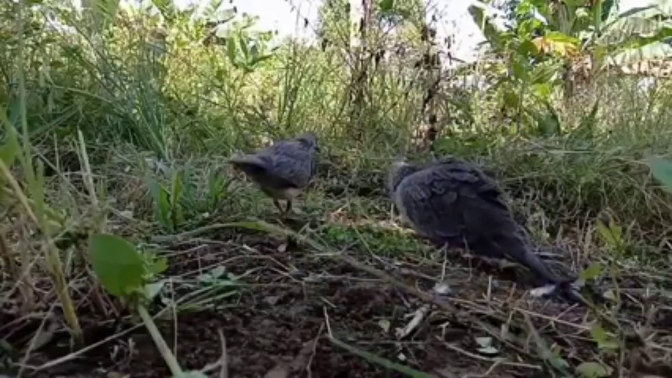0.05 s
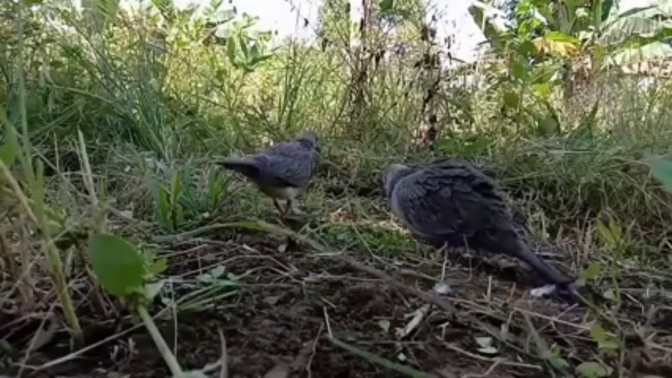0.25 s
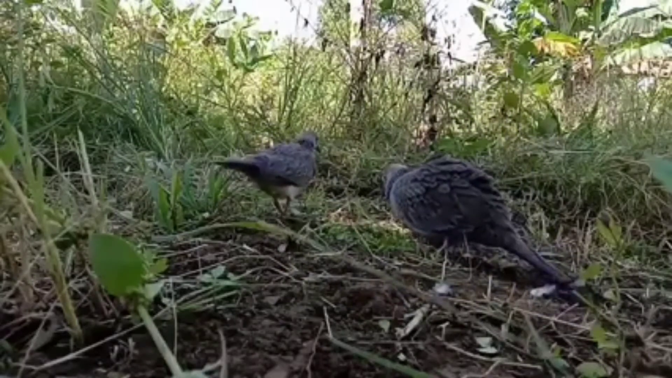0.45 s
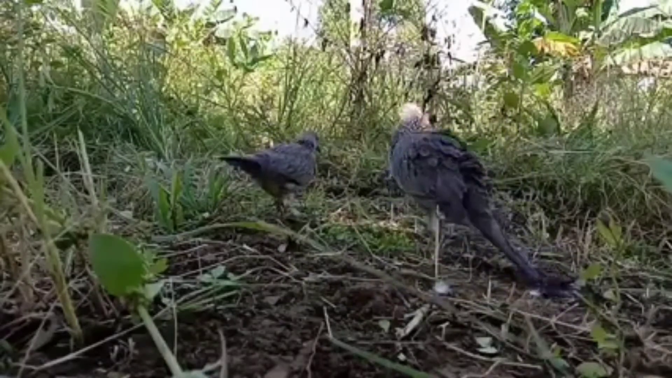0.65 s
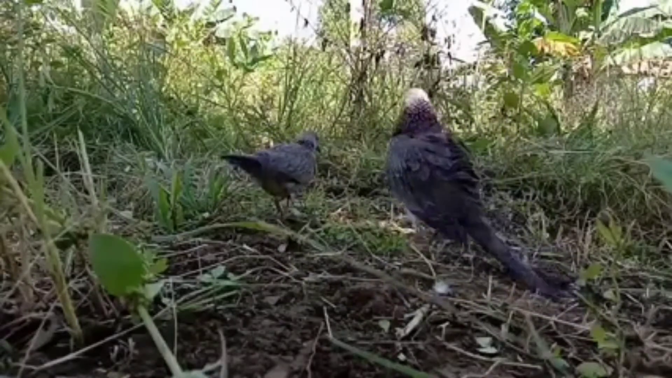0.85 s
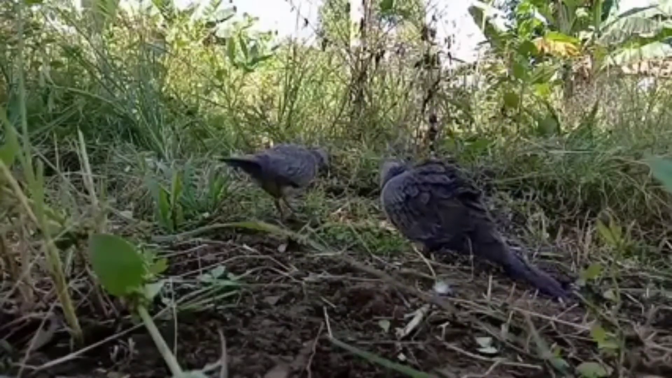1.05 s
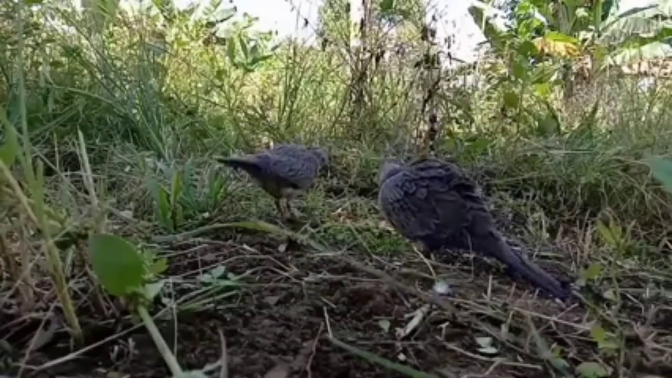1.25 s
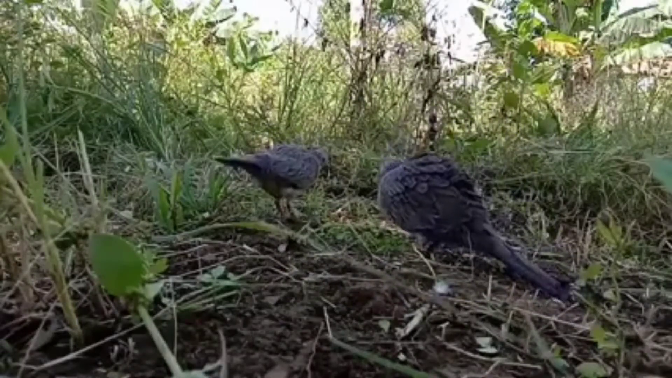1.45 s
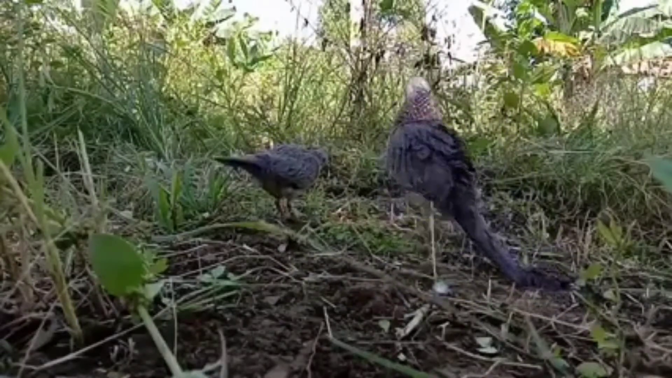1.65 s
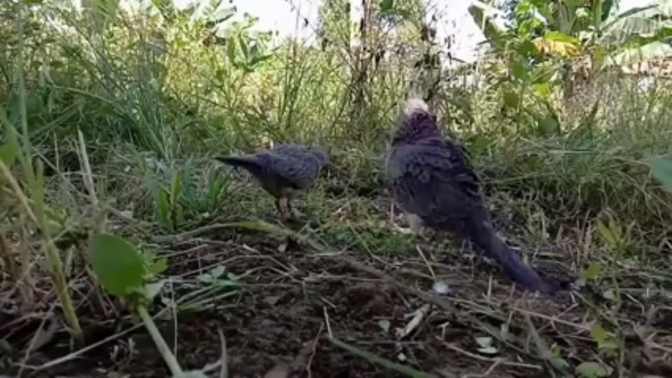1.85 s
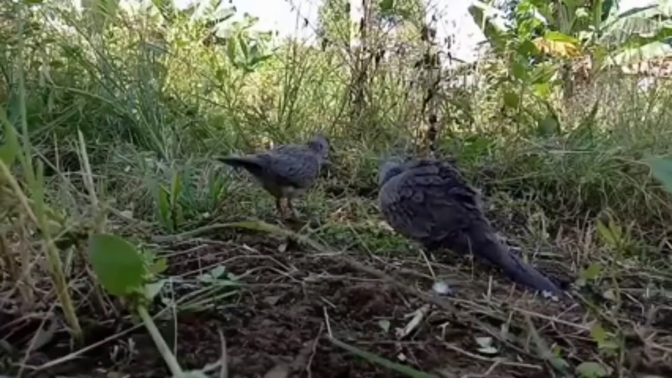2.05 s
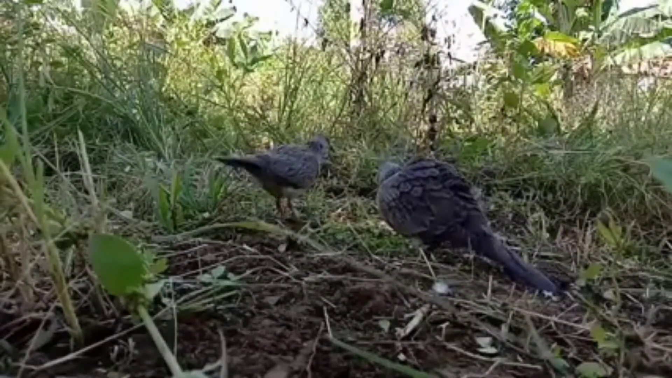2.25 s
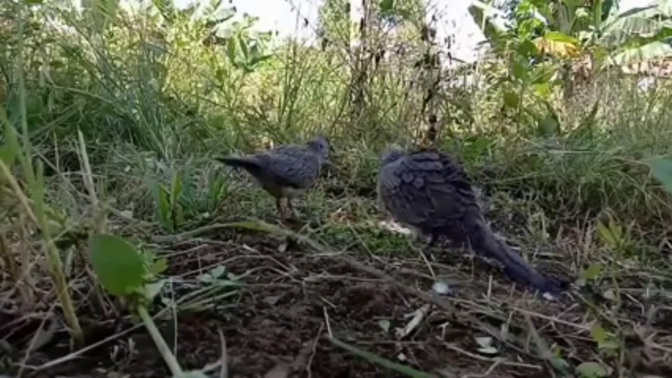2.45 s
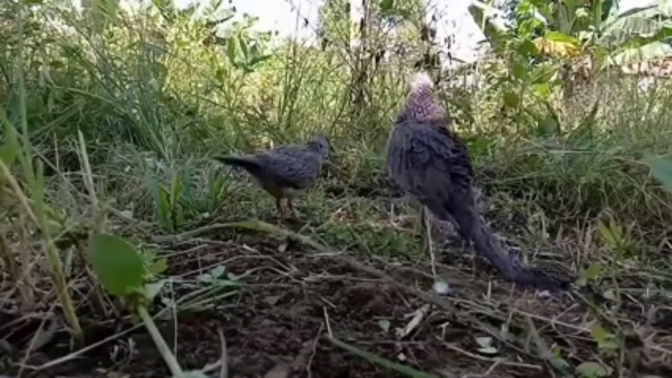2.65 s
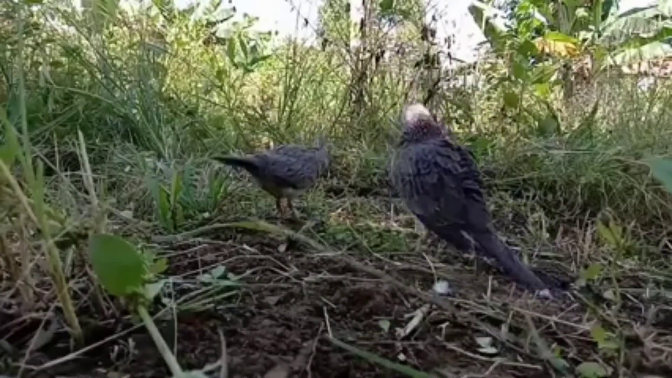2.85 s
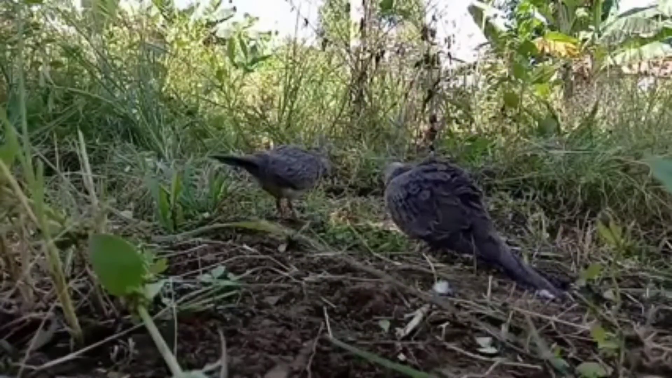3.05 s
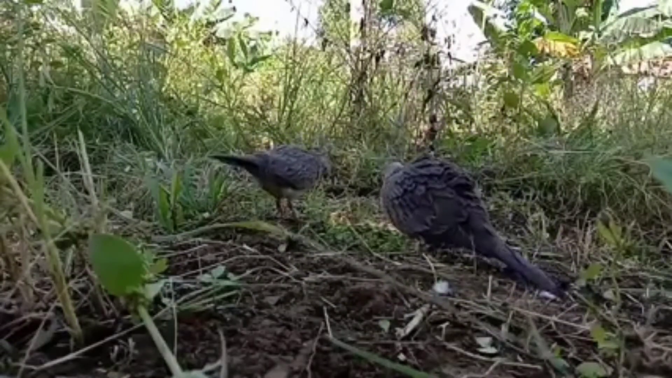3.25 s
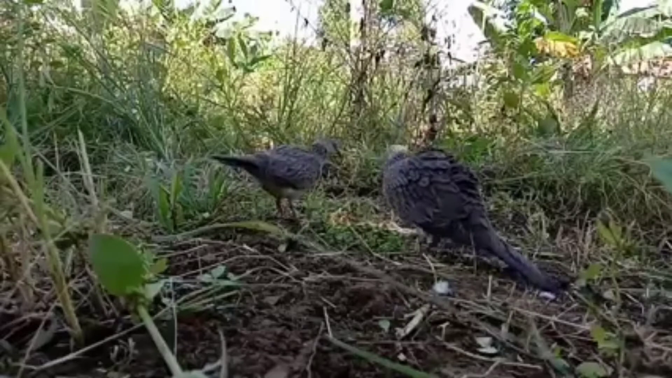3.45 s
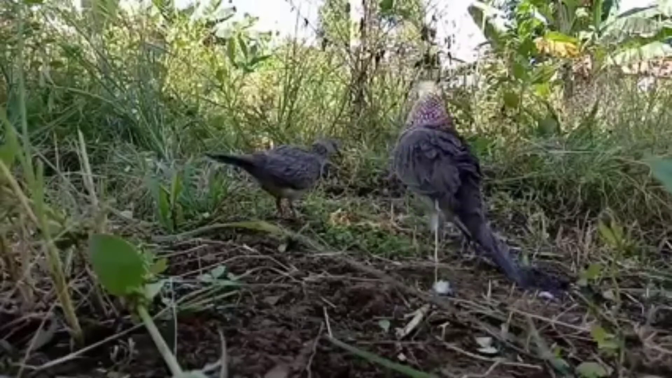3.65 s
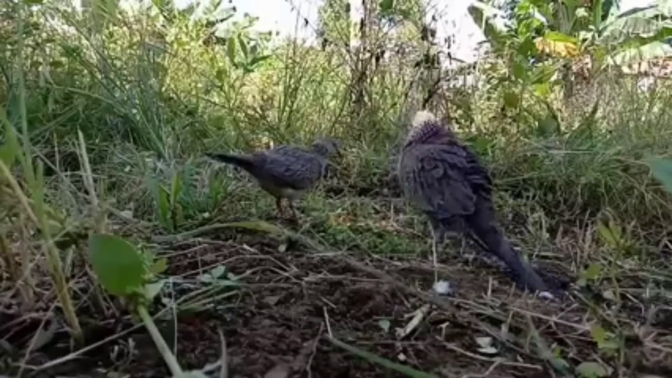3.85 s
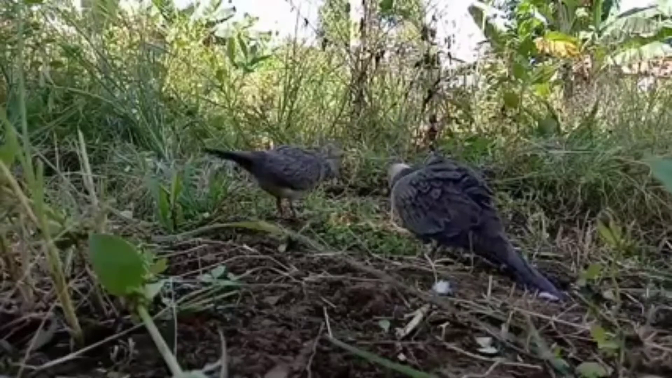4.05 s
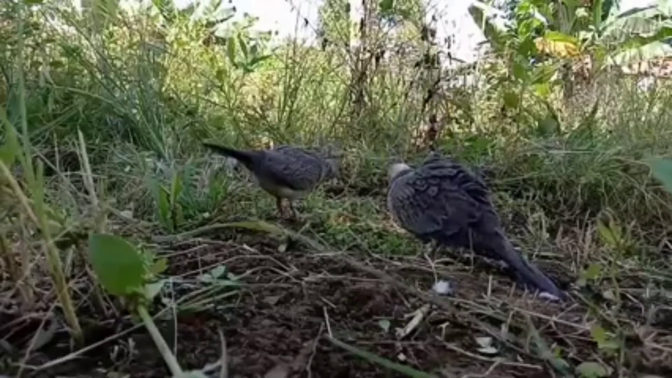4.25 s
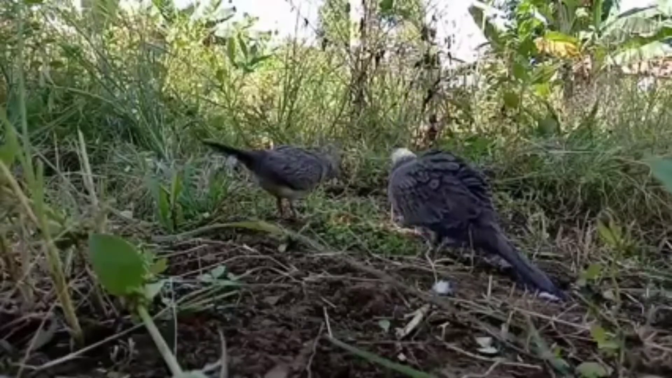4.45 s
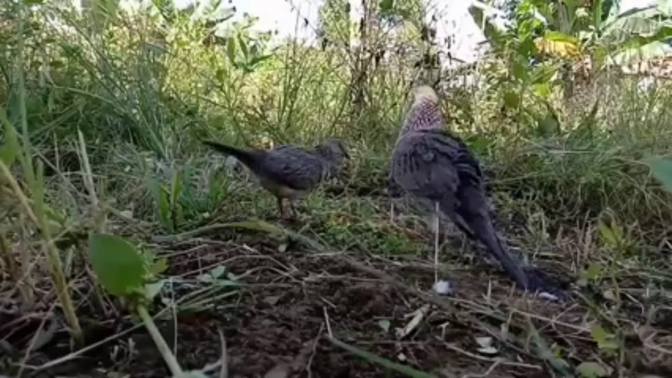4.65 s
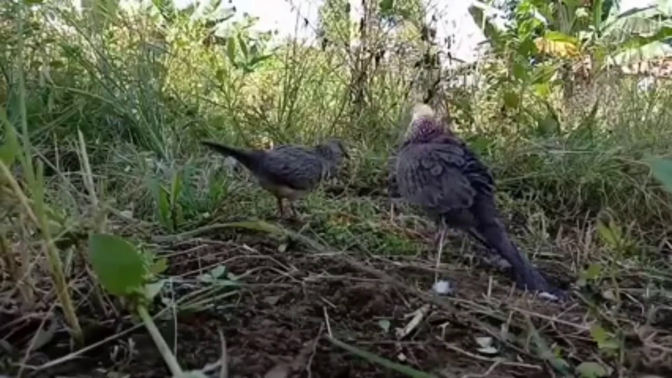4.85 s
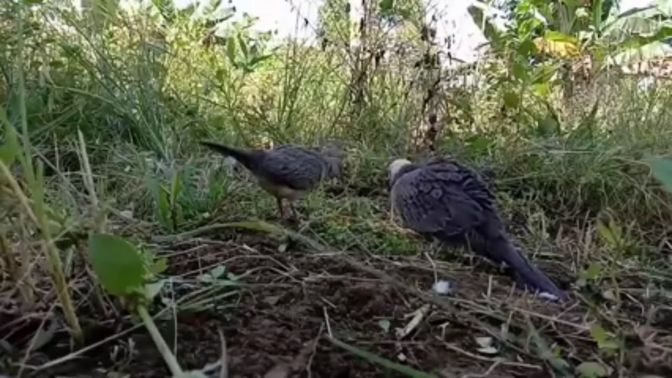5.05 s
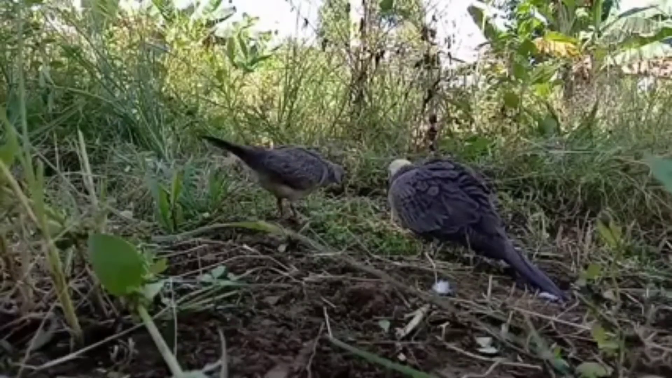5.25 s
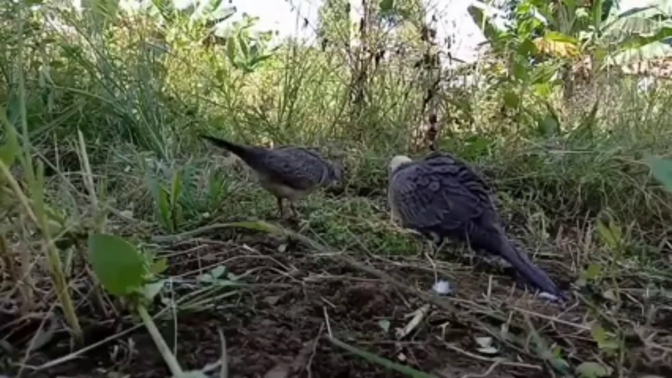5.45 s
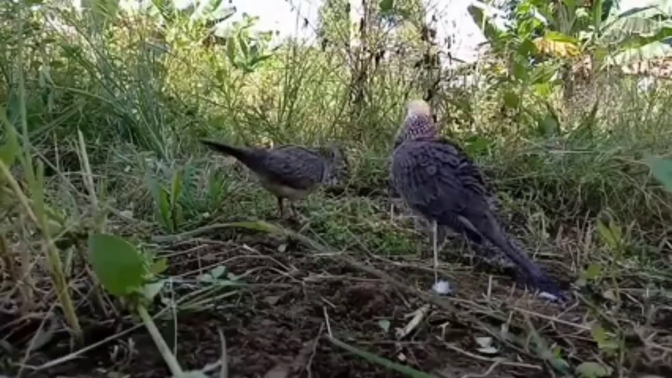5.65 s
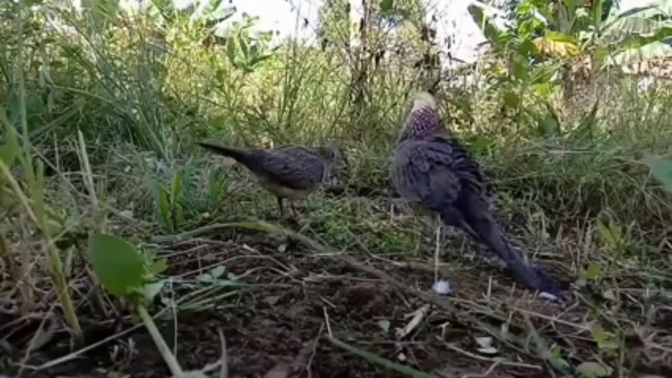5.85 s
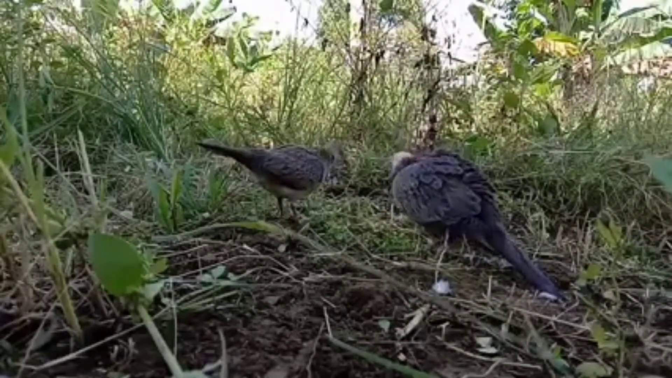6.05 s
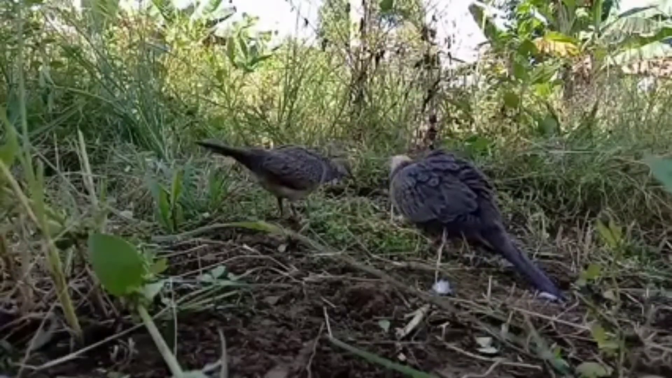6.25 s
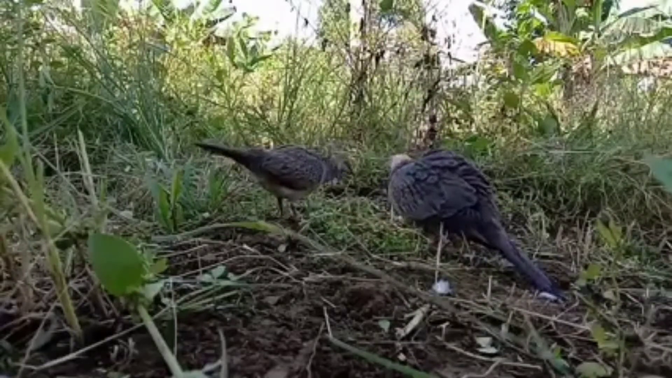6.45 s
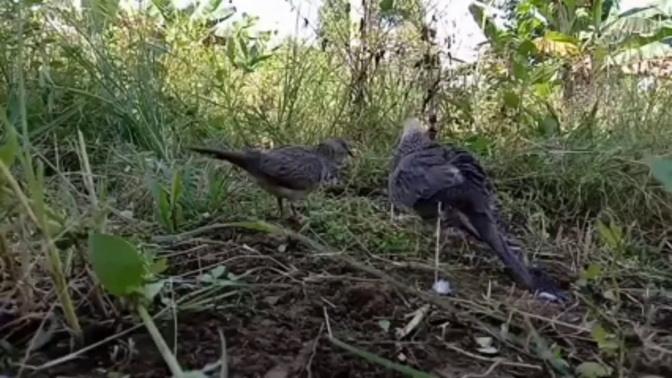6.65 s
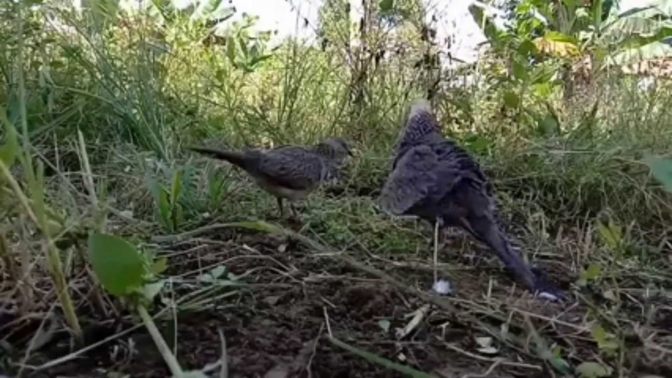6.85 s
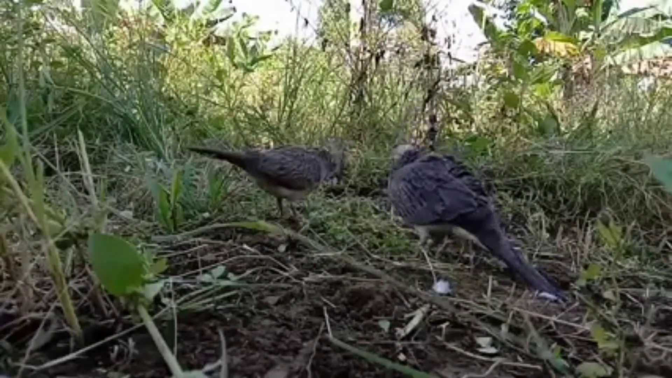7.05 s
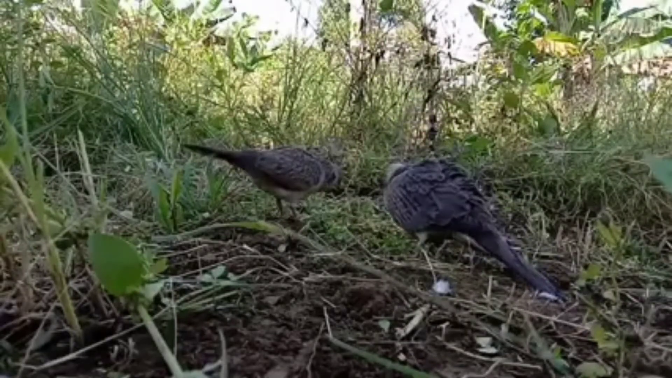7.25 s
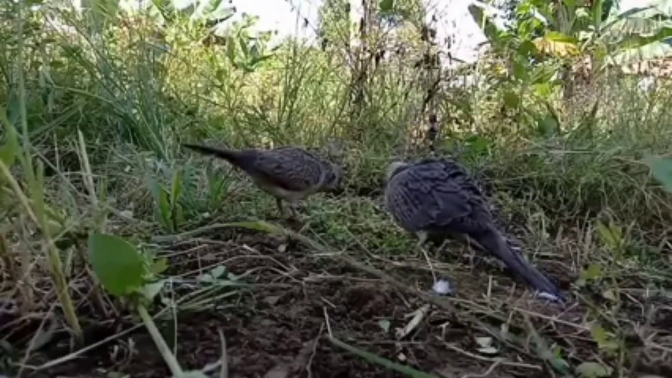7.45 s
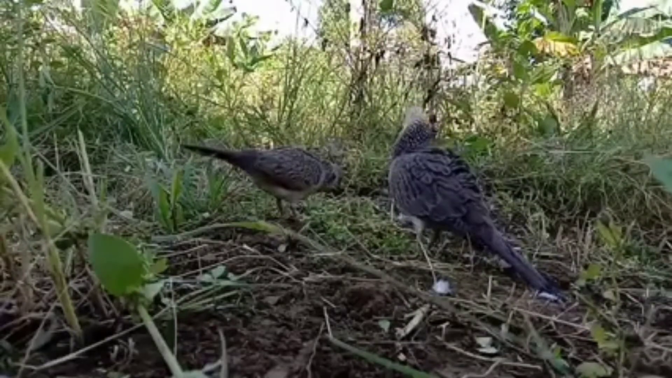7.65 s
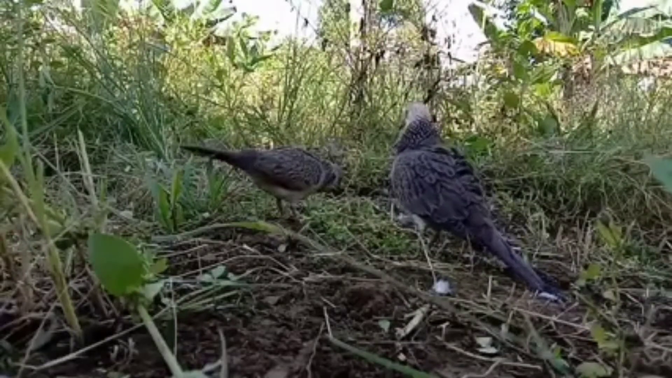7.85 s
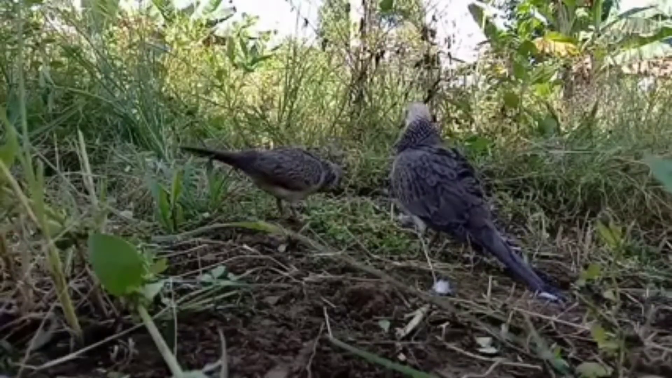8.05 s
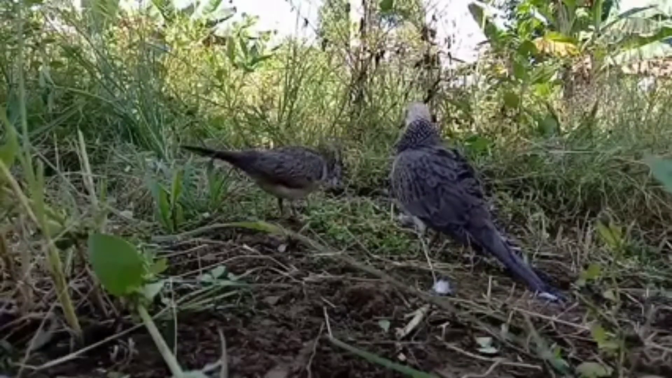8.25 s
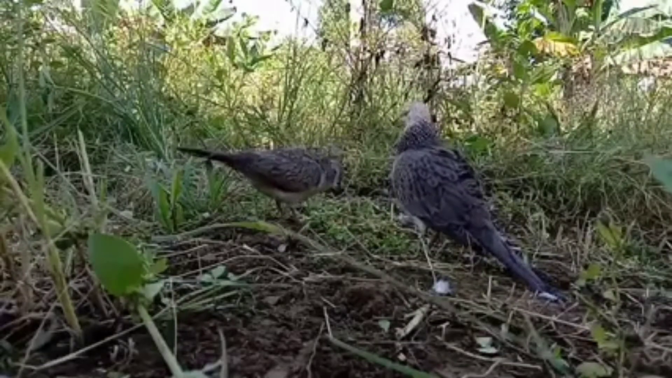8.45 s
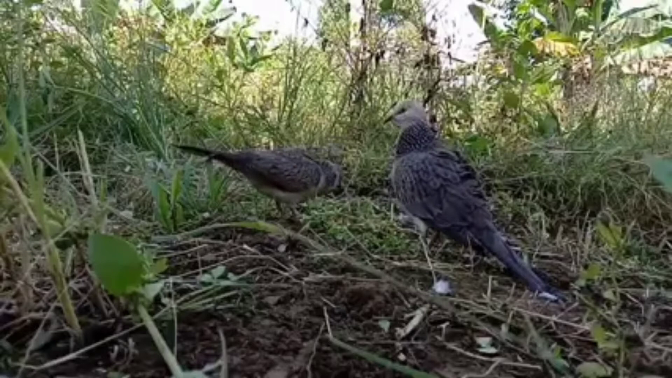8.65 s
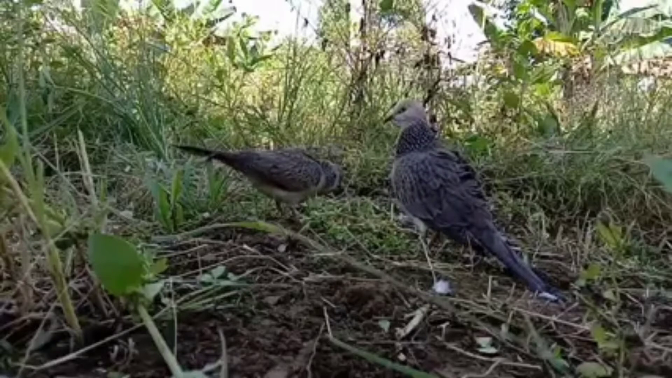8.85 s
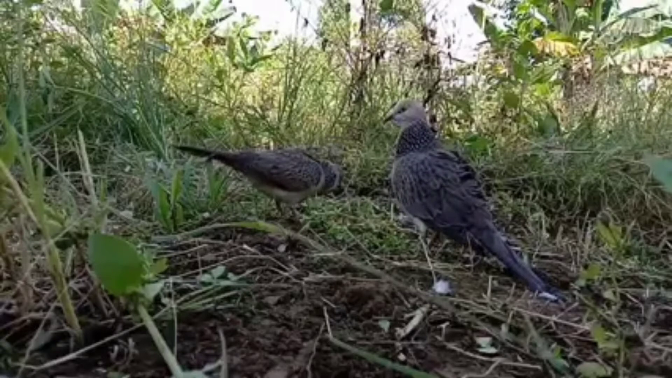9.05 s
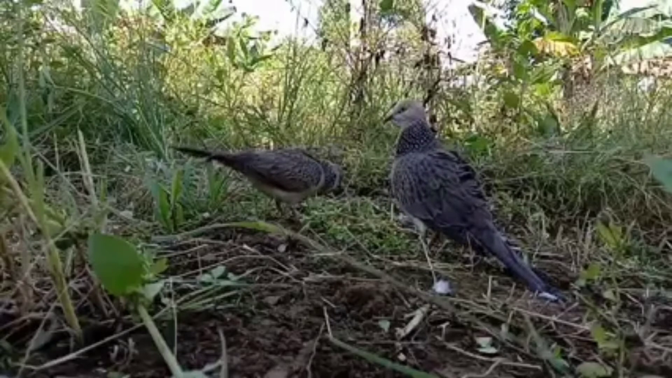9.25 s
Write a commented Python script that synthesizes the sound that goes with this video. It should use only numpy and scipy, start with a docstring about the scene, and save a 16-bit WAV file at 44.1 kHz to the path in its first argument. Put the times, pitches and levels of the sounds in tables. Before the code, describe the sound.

A dove coos close by from the very start, outdoors on open ground with little echo. It gives seven pairs of hollow, throaty, fluttering notes, each a short coo followed by a longer one, about one pair every second until 6.8 seconds. Three quick notes follow from about 7.3 to 7.6 seconds. Then come softer, slightly lower coos: a long one at 7.8, a short one at 8.6 and a long one from 9 seconds to the end. Behind the dove, small birds in the bushes give faint rising chirps, thin peeps and brief buzzy scolds throughout. Dry litter rustles lightly around 2 seconds and again near 4.8. A very faint hum of distant traffic and a thin, steady insect note lie underneath, the traffic growing a little after 7 seconds.

```python
"""Distant traffic hums and an insect sings throughout, on open ground. Right away a spotted dove close by
bows and coos seven short-long pairs of notes, each a hollow tone that its throat chops into about a
hundred swells a second. Meanwhile small birds chirp and scold in the bushes and dry litter rustles.
After seven seconds the traffic is a little louder, and the dove gives three quick notes,
then ends with softer coos: long, short, long."""
import sys
import numpy as np
from scipy import signal
from scipy.fft import rfft, irfft, next_fast_len
from scipy.io import wavfile
from scipy.ndimage import uniform_filter1d, map_coordinates

SR = 44100
rng = np.random.default_rng(int(sys.argv[2]) if len(sys.argv) > 2 else 0)


def digitize_waveform(pressure):
    """Quantize a signal to 16-bit integers and store it at the path in sys.argv[1].

    Rows of a 2-D input are taken as channels; values are limited to [-1, 1].
    """
    field = np.atleast_2d(pressure).T
    bounded = np.clip(field, -1, 1)
    quanta = np.round(bounded * 32767).astype(np.int16)
    wavfile.write(sys.argv[1], SR, quanta)


N = 410571


def amp(db):
    """Turn decibels into a number to multiply by."""
    return 10 ** (np.asarray(db) / 20)


def unit(x):
    """Scale a sound so that its average level (rms) is 1."""
    return x / np.sqrt(np.mean(x ** 2) + 1e-20)


def along(points, hz):
    """Read between (Hz, value) points, with octaves evenly spaced."""
    freqs, values = np.transpose(points)
    return np.interp(np.log(hz + 1), np.log(freqs + 1), values)


def add(out, start, x):
    """Mix x into out at a time in seconds, with softened ends."""
    now = round(start * SR) + np.arange(len(x))
    inside = (now >= 0) & (now < len(out))
    soft_ends = signal.windows.tukey(inside.sum(), min(SR / 125 / inside.sum(), 1))
    out[now[inside]] += x[inside] * soft_ends


def wobble(rate, size):
    """A smooth random curve through `rate` new values a second."""
    values = rng.standard_normal(int(size * rate / SR) + 4)
    return map_coordinates(values, [np.arange(size) * rate / SR])


def filtered(x, response):
    """Turn each frequency up or down by response(hz)."""
    size = next_fast_len(len(x) + 8192)
    return irfft(rfft(x, size) * response(np.fft.rfftfreq(size, 1 / SR)), size)[:len(x)]


def noise(spectrum):
    """Noise shaped by (Hz, dB) points, at level 1."""
    return unit(filtered(rng.standard_normal(N), lambda hz: amp(along(spectrum, hz))))


def narrow(centre_hz, width_hz):
    """Noise gathered around one frequency, at level 1."""
    white = rng.standard_normal(N)
    return unit(filtered(white, lambda hz: 1 / (1 + ((hz - centre_hz) / width_hz) ** 2) ** 2))


def span(start, length, margin_s=.06):
    """Seconds since a sound's start, with room on both sides for its fades."""
    return np.arange(round((start - margin_s) * SR), round((start + length + margin_s) * SR)) / SR - start


def envelope(t, length, attack_s, release_s):
    """Fade in (attack), hold and fade out (release), passing half height at 0 and at length."""
    return (1 + np.tanh(t / attack_s / 2)) * (1 + np.tanh((length - t) / release_s / 2)) / 4


def uneven(x, depth_db, count=110):
    """Give a sound its own chance peaks and dips from bass to treble."""
    gain = unit(amp(depth_db * rng.standard_normal(count)))
    return filtered(x, lambda hz: np.interp(hz, np.linspace(0, SR / 2, count), gain))


# How loud the traffic is. Each row: time in seconds, level in dB.
TRAFFIC_LEVELS = [(0, -65), (3, -65.5), (6.3, -64.5), (7.3, -61.5), (9.31, -60.5)]
# The tone of the traffic and of the air. Each row: frequency in Hz, relative level in dB.
TRAFFIC_SPECTRUM = [(15, -47), (25, -19), (32, -21), (43, -24.5), (73, -2.5), (102, 5.5), (135, -5),
                    (162, 0.5), (210, -20), (260, -22.5), (340, -47), (570, -120)]
AIR_SPECTRUM = [(120, -14.5), (200, -2), (280, -5), (620, -3.5), (1000, -7), (1600, -13), (2500, -15.5),
                (3100, -16), (4200, -20), (6500, -25), (7600, -17), (8600, -33.5), (11000, -29.5),
                (15000, -27.5)]
def background(air_db=-69, insect_db=-82, ring_db=-11):
    """Far traffic hums, air hisses and an insect holds a thin note; a faint ring sounds near 1265 Hz."""
    road_db = np.interp(np.arange(N) / SR, *np.transpose(TRAFFIC_LEVELS))
    ring = narrow(centre_hz=1265, width_hz=80) * unit(amp(3 * wobble(7, N)))
    insect = narrow(centre_hz=5820, width_hz=85) * unit(amp(3 * wobble(2, N) + 2 * wobble(9, N)))
    hum = amp(road_db + 3.8 * wobble(25, N)) * noise(TRAFFIC_SPECTRUM)
    air = amp(air_db + .27 * wobble(1.6, N)) * noise(AIR_SPECTRUM)
    return hum + amp(road_db + ring_db) * ring + air + amp(insect_db) * insect


# How long the bushes echo. Each row: frequency in Hz, seconds to fade by 60 dB.
ECHO_TIMES = [(300, 0.31), (700, 0.36), (3000, 0.44), (10000, 0.017)]
def bush_echoes(x):
    """The bushes scatter sound into echoes that die sooner in the treble."""
    hz, t, bands = signal.stft(rng.standard_normal(SR // 2), SR, nperseg=256)
    tail = signal.istft(bands * amp(-60 * t / along(ECHO_TIMES, hz)[:, None]), SR, nperseg=256)[1]
    return signal.fftconvolve(x, tail / np.linalg.norm(tail))[:N]


# Far birds' peeps. Each row: start in seconds, length in seconds, pitch in Hz, level in dB.
FAR_PEEPS = [(2.16, 0.025, 1850, -65), (8.36, 0.017, 2150, -57), (4.651, 0.064, 1860, -64.5),
             (4.73, 0.1, 1710, -71.5), (4.94, .06, 1810, -74), (8.259, 0.084, 4030, -67.5),
             (8.423, 0.21, 2944, -73.5), (8.654, 0.054, 4040, -64.5), (9.151, 0.033, 4170, -62)]
def peeps(fall=.03):
    """Farther birds whistle thin, unsteady peeps that fall a little in pitch."""
    out = np.zeros(N)
    for start, length, pitch_hz, db in FAR_PEEPS:
        position = np.linspace(-1, 1, round(length * SR))
        level = amp(db) * (1 - position ** 2) * unit(amp(7.4 * wobble(90, len(position))))
        hz = pitch_hz * (1 - fall * position + .012 * wobble(300, len(position)))
        add(out, start, level * np.sin(2 * np.pi * np.cumsum(hz) / SR))
    return out


# Rustles. Each row: start in seconds, length in seconds, level in dB, Hz above which it is dulled.
LITTER_SCUFFS = [(1.852, .062, -49, 14000), (1.987, .078, -48.5, 14000), (2.765, .035, -60.5, 4500),
                 (4.817, 0.046, -55, 3450), (8.346, .035, -66, 12000)]
# The tone of dry litter. Each row: frequency in Hz, relative level in dB.
LITTER_SPECTRUM = [(500, -22), (1100, -18.5), (1900, -1), (2600, -11.5), (3200, 2.5), (4000, -5.5),
                   (6000, -7), (8000, -18.5), (11000, -25.5), (15000, -27.5)]
def scuffs(crackle_db=2):
    """Dry stalks and leaves crackle in clumps of tiny grains."""
    out = np.zeros(N)
    grains = unit(amp(crackle_db * wobble(700, N))) * noise(LITTER_SPECTRUM)
    for start, length, db, dull_hz in LITTER_SCUFFS:
        t = span(start, length)
        now = np.round((start + t) * SR).astype(int)
        stroke = envelope(t, length, attack_s=.0053, release_s=.014) * grains[now]
        dulled = filtered(stroke, lambda hz: 1 / np.sqrt(1 + (hz / dull_hz) ** 4))
        add(out, start + t[0], amp(db) * dulled)
    return out


# Harsh calls. Each row: start and length in seconds, low buzz level in dB, high buzz level in dB,
# centre of the high buzz in Hz, hoarse tone level in dB.
SCOLD_CALLS = [(0.139, 0.028, -71, -62, 5260, -65.5), (0.766, .046, -76.5, -57.5, 5330, -67.5),
               (1.418, 0.07, -76.5, -55, 5300, -63), (2.196, .088, -60.5, -61, 4780, -70.5),
               (4.314, .06, -62, -56, 4980, -79), (4.542, .085, -67, -63, 5380, -80.5),
               (5.968, 0.09, -55.5, -52.5, 4800, -71.5), (7.1, .078, -54.5, -55, 4820, -77.5),
               (8.97, .048, -58.5, -54, 5150, -65.5)]
# The tone of the two buzzes. Each row: frequency in Hz, relative level in dB.
LOW_BUZZ = [(1300, -35), (1700, -5), (2100, 1), (2500, -4), (2750, -18), (3000, -16), (3250, -2), (3650, 2),
            (3950, -5), (4300, -22), (5500, -50)]
HIGH_BUZZ = [(3200, -43.5), (4200, -7), (4500, -1), (4750, -0.5), (5050, 3.5), (5500, -1), (6000, -23.5),
             (8000, -28.5), (15000, -43)]
def scolds(rest_hz=5000):
    """Small birds scold: a low buzz that stays put and a high one set by the beak, over a hoarse tone."""
    out = np.zeros(N)
    low = noise(LOW_BUZZ)
    high = signal.hilbert(noise(HIGH_BUZZ), next_fast_len(N))  # a form that can slide in frequency
    hoarse = narrow(centre_hz=3000, width_hz=160)
    for start, length, low_db, high_db, centre_hz, hoarse_db in SCOLD_CALLS:
        t = span(start, length)
        now = np.round((start + t) * SR).astype(int)
        beak = amp(high_db) * np.real(high[now] * np.exp(2j * np.pi * (centre_hz - rest_hz) * t))
        beak *= envelope(t, length, attack_s=.0033, release_s=.011)
        body = amp(low_db) * low[now] + amp(hoarse_db) * hoarse[now]
        body *= envelope(t, length, attack_s=.002, release_s=.0061)
        add(out, start + t[0], uneven(body + beak, depth_db=2))
    return out


# Small birds' chirps. Each row: start and length in seconds, main tone's final level in dB,
# octave's opening level in dB, first and last pitch in Hz, final pitch shake as a share of the pitch.
BIRD_CHIRPS = [(-.03, 0.083, -52, -75.5, 2950, 3087, .012), (.052, 0.032, -54.5, -78.5, 3050, 3310, .015),
               (.595, 0.038, -57.5, -73, 2900, 3160, 0.044), (1.3, 0.024, -48, -53.5, 2900, 2870, .015),
               (1.329, .035, -55, -67, 3000, 3310, 0.023), (2.963, 0.077, -62.5, -57.5, 2860, 3160, .03),
               (4.16, .068, -62, -62, 2640, 3160, 0.033), (5.795, 0.068, -52, -55.5, 2756, 3180, .022),
               (6.931, .065, -53, -56.5, 2740, 3205, 0.039), (7.812, 0.065, -49, -60, 2860, 2996, 0.016),
               (7.897, 0.034, -52, -66.5, 3165, 3100, 0.026), (8.863, 0.057, -47, -58, 2843, 3086, 0.0098),
               (8.946, .035, -54, -60, 3040, 3250, 0.046)]
def chirps(third_db=-38, fourth_db=-28, grow_db=8, thin_db=16, slide_at=.42, steepness=13):
    """Small birds whistle ragged, mostly rising slides; the octave above gives way to the main tone."""
    out = np.zeros(N)
    for start, length, db, octave_db, first_hz, last_hz, last_shake in BIRD_CHIRPS:
        t = span(start, length)
        slide = (1 + np.tanh(steepness * (t / length - slide_at) / 2)) / 2
        shake = .012 + (last_shake - .012) * slide  # the voice breaks up at the top
        pitch_hz = (first_hz + (last_hz - first_hz) * slide) * (1 + shake * wobble(700, len(t)))
        phase = 2 * np.pi * np.cumsum(pitch_hz) / SR
        ragged = unit(amp(2.8 * wobble(350, len(t))))
        level = np.sqrt(2) * ragged * envelope(t, length, attack_s=.005, release_s=.004)
        main = amp(db - grow_db * (1 - slide)) * (np.sin(phase) + amp(third_db) * np.sin(3 * phase))
        octave = amp(octave_db - thin_db * slide) * (np.sin(2 * phase) + amp(fourth_db) * np.sin(4 * phase))
        add(out, start + t[0], level * (main + octave))
    return out


# When the dove bows, in seconds.
BOW_TIMES = [1.095, 2.09, 3.066, 4.068, 5.112, 6.144, 7.225]
def bow_ticks(level_db=-58, length_s=.031):
    """A soft, dull tick as the dove bows into its call."""
    touch = np.zeros(N)
    for moment in BOW_TIMES:
        add(touch, moment - length_s / 2, np.hanning(round(length_s * SR)))
    return amp(level_db) * touch * narrow(centre_hz=800, width_hz=450)


# The tone of the thump that opens a note. Each row: frequency in Hz, relative level in dB.
THUMP_SPECTRUM = [(20, -5.5), (45, -4.5), (150, -8.5), (330, -2), (500, -11), (900, -39)]
def onset_thumps(notes, relative_db=-42, length_s=.043):
    """A soft, low thump opens each note; louder notes thump harder."""
    pulses = np.zeros(N)
    for start, _, db, *_ in notes:
        add(pulses, start - length_s / 2, amp(db + relative_db) * np.hanning(round(length_s * SR)))
    return pulses * noise(THUMP_SPECTRUM)


def throat_swells(t, rate, detune_hz, first_s=.004, swell_s=.00205, jitter_s=.0003, limp_s=.00022):
    """Overlapping swells, each out of step with the last, split a tone into several that beat together."""
    beats = np.nonzero(np.diff(np.floor((t - first_s) * rate)))[0]
    late, slip, size = rng.standard_normal((100, 3))[:len(beats)].T
    limp = limp_s * (-1) ** np.arange(len(beats))  # long and short gaps take turns
    moments = t[beats] + jitter_s * late + limp
    swells = 1 / np.cosh((t - moments[:, None]) / swell_s)
    turn = 2 * np.pi * np.cumsum(detune_hz)[beats] / SR + .6 * (slip + .5 * np.cumsum(slip))
    flutter = (amp(.6 * size) * np.exp(1j * turn)) @ swells  # holds both loudness and phase
    flow = uniform_filter1d(uniform_filter1d(np.abs(flutter) ** 2, size=700), size=700)
    return flutter / np.sqrt(np.abs(flow) + 1e-9)  # the air flow stays even


# The tone of air in the throat, of the band that hard coos spill into, and of the puffed neck,
# which gives off little bass. Each row: frequency in Hz, relative level in dB.
BREATH_SPECTRUM = [(250, -36.5), (400, -16.5), (600, -20), (830, 12.5), (1000, 5.5), (1150, -19.5),
                   (1400, -31.5), (2500, -60)]
STRAIN_SPECTRUM = [(700, -35.5), (900, -5.5), (1100, 12), (1260, 0), (1380, -8.5), (1500, -14), (1650, -36),
                   (2500, -62)]
NECK_RESPONSE = [(200, -27.5), (330, -3), (430, -7.5), (520, -2.5), (700, 0.5), (830, 3), (1000, 5.5)]
# The dove's notes. Each row: start and length in seconds, level in dB before the neck shapes it,
# attack and release in seconds, pitch it rises toward in Hz, size of that rise in Hz,
# strongest tone in Hz, swells per second, fade by the end in dB (below zero it grows).
DOVE_NOTES = [ (0.159, 0.15, -19, 0.0025, 0.0029, 670, 55.3, 653, 106, -0.5),
              (0.438, 0.36, -19, .006, 0.0041, 662, 85.1, 614, 121, 1),
              (1.125, .141, -19.5, 0.0029, 0.0032, 671.5, 55.8, 626, 104, -1.5),
              (1.401, 0.36, -18.5, .007, 0.0053, 673.3, 95, 601, 121, 2),
              (2.12, 0.15, -19.3, .0032, 0.0037, 664.3, 55, 616, 101, 0),
              (2.392, 0.35, -18.5, .006, 0.0044, 676.2, 90, 595.7, 121, 1.9),
              (3.098, 0.15, -19, .004, .0035, 666.6, 55, 611, 101, -0.5),
              (3.371, 0.36, -18.5, .007, 0.0052, 676.4, 84.5, 597.4, 120, 2.5),
              (4.102, .14, -19, .003, .004, 664.3, 55.2, 587.6, 102, 0),
              (4.372, .335, -18.5, 0.0078, .004, 661, 85.4, 621.7, 119, 1.5),
              (5.143, .14, -19, .0036, 0.0033, 663.4, 55.3, 590.6, 98.5, 0),
              (5.405, 0.33, -19, .007, .005, 672, 100.2, 632.7, 118, 1.1),
              (6.179, 0.13, -19, .004, .0035, 665, 55, 610, 98, -1),
              (6.44, 0.31, -18.5, .007, 0.0046, 665, 84.1, 605.4, 115, 0.9),
              (7.261, .14, -18.5, .004, .007, 659, 55.3, 600.7, 97, -0.5),
              (7.4, .125, -35.5, 0.0025, .006, 560, 29.4, 543, 120, 3.5),
              (7.53, 0.084, -19, 0.011, .008, 624, 34.55, 612, 86, 7),
              (7.757, 0.48, -25, 0.022, 0.0088, 620, 57, 550.6, 130, 3),
              (8.62, 0.15, -25.5, 0.0059, 0.0039, 603, 35, 554.3, 105, 5.5),
              (8.953, 0.64, -23.5, 0.0061, .007, 622.6, 40.5, 575, 131, -1.5)]
def dove(octave_db=-8, third_db=-50, breath_db=-33, strain_db=-11.5, push_db=-23, push_width_db=2.6,
         rise_s=.029, droop_hz=56, wander_hz=30, settle_s=.38, rasp_rest_hz=628):
    """Coos through a closed beak: a hollow, arching tone that gains an octave and a rasp when pushed."""
    voice, octave, pressure, strain = np.zeros((4, N))
    rasp = signal.hilbert(noise(STRAIN_SPECTRUM), next_fast_len(N))
    for start, length, db, attack_s, release_s, top_hz, rise_hz, strongest_hz, rate, fade_db in DOVE_NOTES:
        t = span(start, length)
        spent = np.clip(t / length, 0, 1) ** 2.5  # pitch and level sink as the air runs out
        effort_db = db - fade_db * spent
        level = amp(effort_db) * envelope(t, length, attack_s, release_s)
        pitch_hz = top_hz - rise_hz * np.exp(-np.maximum(t, -attack_s) / rise_s) - droop_hz * spent
        # The strongest tone wanders at first, settles, and partly follows the pitch.
        drift_hz = wander_hz * np.exp(-t / settle_s) * wobble(35, SR)[:len(t)]
        follow_hz = .55 * (pitch_hz - np.median(pitch_hz))
        flutter = throat_swells(t, rate, detune_hz=strongest_hz + drift_hz + follow_hz - pitch_hz)
        swelling = level * np.abs(flutter)
        phase = 2 * np.pi * np.cumsum(pitch_hz) / SR + np.angle(flutter)
        hard = 1 / (1 + np.exp((push_db - effort_db) / push_width_db))  # 0 is gentle, 1 is pushed hard
        hollow = np.sin(phase) + amp(third_db) * (1 - hard) * np.sin(3 * phase)
        shift = np.exp(2j * np.pi * 1.9 * np.cumsum(pitch_hz - rasp_rest_hz) / SR)  # rides on the pitch
        now = np.round((start + t) * SR).astype(int)
        riding_rasp = np.real(np.take(rasp, now, mode="wrap") * shift)
        rasp_level = hard * np.sqrt(amp(effort_db) * level) * (swelling + level) / 2
        add(voice, start + t[0], np.sqrt(2) * swelling * hollow)
        add(octave, start + t[0], hard * level * swelling * np.sin(2 * phase))
        add(pressure, start + t[0], swelling)
        add(strain, start + t[0], rasp_level * riding_rasp)
    breath = amp(breath_db) * pressure * noise(BREATH_SPECTRUM)
    tone = filtered(voice + breath, lambda hz: amp(along(NECK_RESPONSE, hz)))
    overtone = amp(octave_db) * filtered(octave, lambda hz: amp(along(STRAIN_SPECTRUM, hz)))
    return tone + overtone + amp(strain_db) * strain


def scene():
    """The dove is near and has little echo; the small birds sit deep in the bushes."""
    near = dove() + onset_thumps(DOVE_NOTES) + bow_ticks() + scuffs()
    far = chirps() + peeps() + scolds()
    echoes = bush_echoes(amp(-30.5) * near + amp(-13.5) * far)
    return (near + far + echoes + background())[None]


def record(dry, top_hz=15500):
    """Cut off the very highest treble."""
    return np.array([filtered(x, lambda hz: hz < top_hz) for x in dry])


dry = scene()
out = record(dry)
digitize_waveform(out)
```